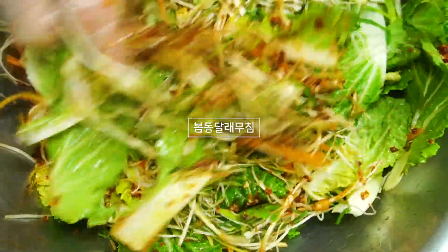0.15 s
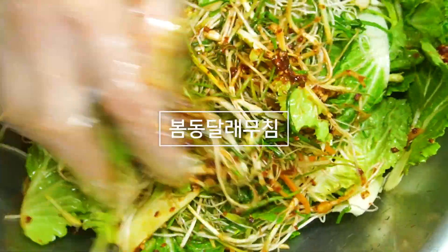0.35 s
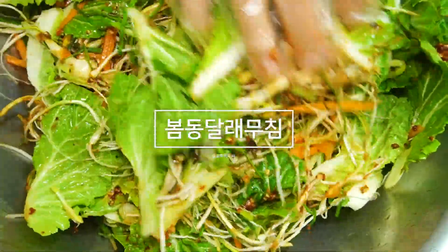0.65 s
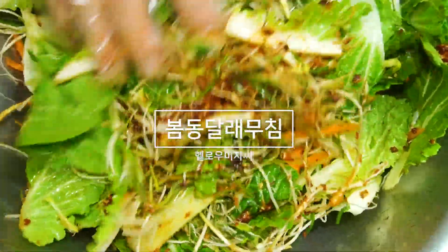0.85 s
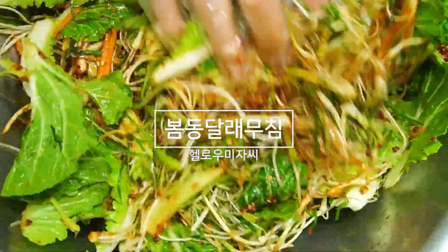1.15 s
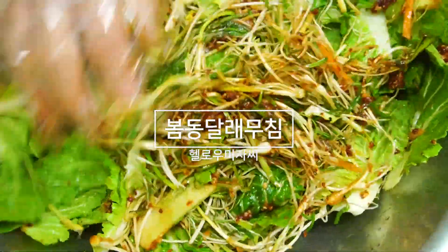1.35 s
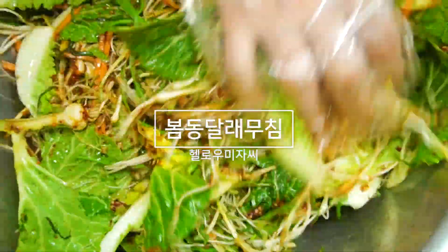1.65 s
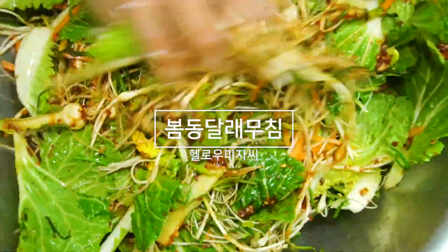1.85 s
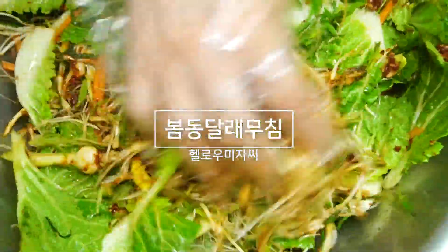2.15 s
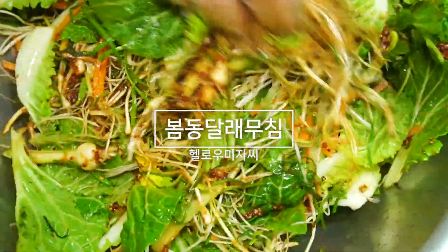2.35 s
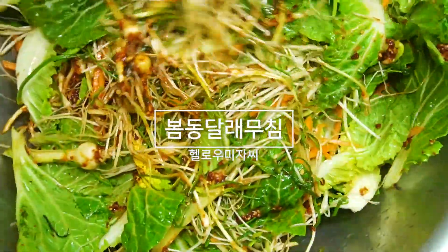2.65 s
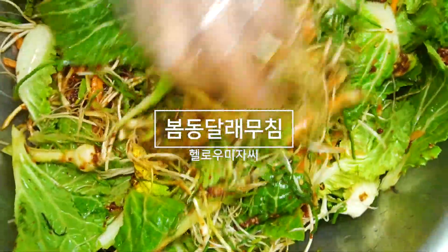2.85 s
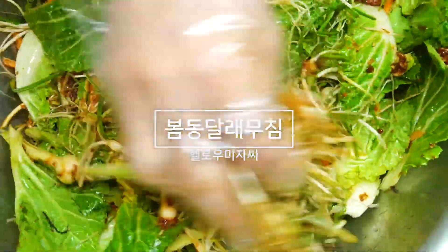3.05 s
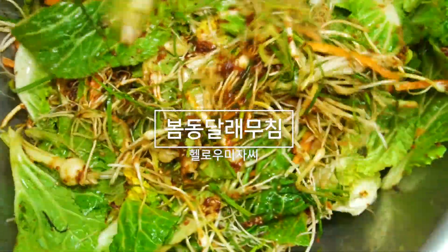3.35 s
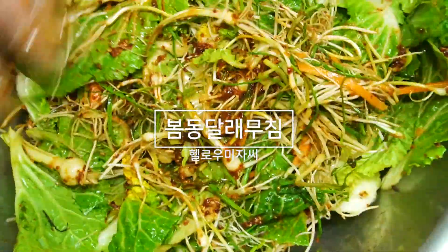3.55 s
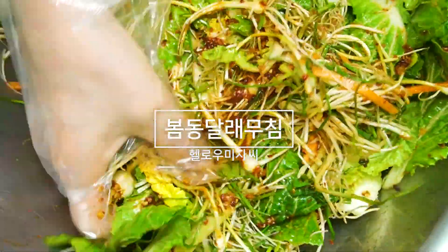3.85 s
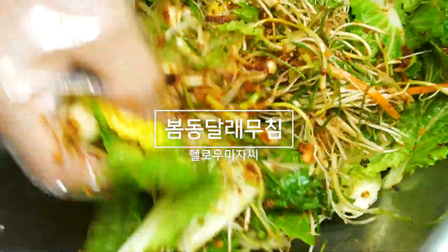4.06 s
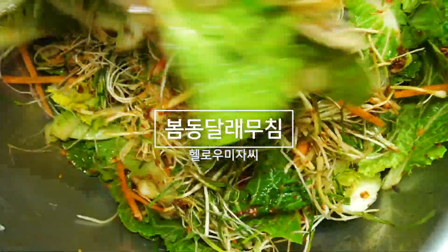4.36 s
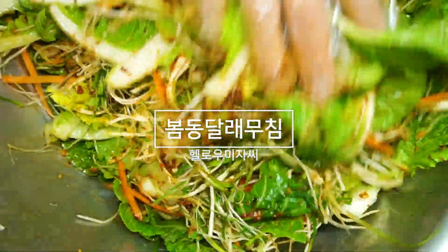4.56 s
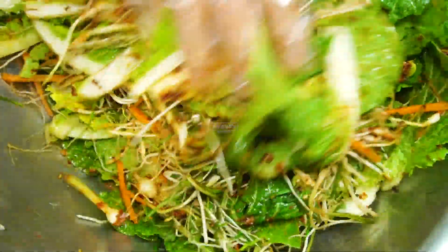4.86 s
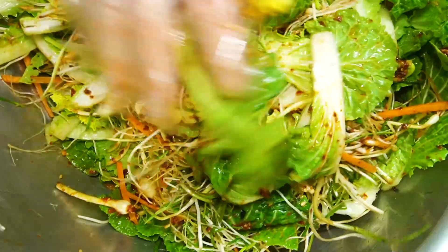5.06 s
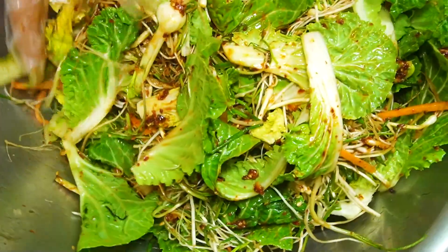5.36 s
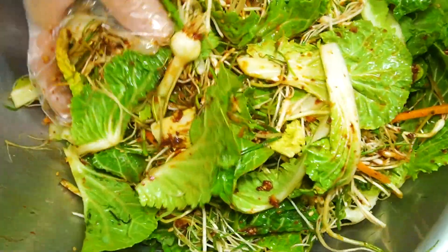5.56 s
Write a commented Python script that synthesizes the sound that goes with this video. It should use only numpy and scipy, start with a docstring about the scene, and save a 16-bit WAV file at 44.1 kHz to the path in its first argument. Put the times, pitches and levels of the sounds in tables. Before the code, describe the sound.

Close up, hands in thin plastic gloves toss dressed leaves and sprouts in a steel bowl. Quick, uneven strokes bring wet rustling, small squelches and tiny pops, topped by bright crinkles and snaps of the plastic. The heap pats dully against the bowl, with a few soft knocks in the middle and near the end. The mixing eases briefly twice, over the faint low hum of a small kitchen.

```python
"""Tossing salad in a steel bowl

Close up, hands in thin plastic gloves toss wet leaves and sprouts. The leaves rustle and squelch
in tiny sticky slips, bubbles of dressing pop, and the glove film crinkles and snaps. The shifting
heap and a few soft knocks sound the damped bowl. Behind it all sits a small kitchen with a low hum."""
import sys
import numpy as np
from scipy import signal
from scipy.fft import rfft, irfft
from scipy.io import wavfile
from scipy.ndimage import uniform_filter1d

SR = 44100
rng = np.random.default_rng(int(sys.argv[2]) if len(sys.argv) > 2 else 0)


def dump_mix(stems):
    """Bounce the given channels to the path in sys.argv[1] as a 16-bit WAV at rate SR."""
    frames = np.atleast_2d(stems).T  # one column per channel
    limited = np.clip(frames, -1, 1)  # hard clip at full scale
    pcm = np.round(limited * 32767).astype(np.int16)
    wavfile.write(sys.argv[1], SR, pcm)


N = 251652
TIME = np.arange(N) / SR

# one row per grab, toss or squeeze: (full grip [s], rise [s], hold [s], fall [s], leaf rustle [dB],
# glove crinkle [dB], push on the bowl [dB], squelch over rustle [dB], glove left over right [dB])
STROKES = [(0.01, 0.017, .01, 0.14, -36.5, -41.5, -45, -6, -5),
           (0.10, 0.018, 0.095, 0.082, -34.5, -37, -46, -5, 3),
           (0.30, 0.091, .01, .2, -37, -37.5, -41.5, -3, 7),
           (0.46, .1, .14, 0.18, -32, -31, -39.5, -3.5, 0),
           (0.76, 0.19, 0.031, 0.24, -30.5, -30, -39.5, -3, -2),
           (0.91, 0.078, 0.054, 0.35, -41.5, -33, -40.5, 2, 1),
           (1.18, 0.13, .03, 0.24, -35, -31, -38.5, -1, -2.5),
           (1.35, 0.13, 0.024, 0.22, -30.5, -30.5, -36.5, -3.5, 3),
           (1.65, 0.24, 0.022, 0.32, -31.5, -32, -38.5, -1, -4.5),
           (1.87, 0.18, 0.11, 0.27, -32.5, -31.5, -40, -3, -0.5),
           (2.16, 0.16, 0.044, 0.23, -34.5, -35, -43, 0, 1.5),
           (2.275, 0.03, 0.0063, 0.061, -34.5, -38, -43, 5, -3),
           (2.35, .04, 0.058, 0.23, -37, -34.5, -43.5, -1, -2),
           (2.55, 0.12, .02, 0.19, -43.5, -43, -51, -3, 2),
           (2.75, 0.14, .03, 0.21, -39.5, -37.5, -43.5, 2.5, 1),
           (2.84, 0.065, 0.014, 0.054, -30, -28.5, -33, -3, 1),
           (2.90, 0.051, 0.017, 0.23, -33, -32.5, -39.5, -3, -1),
           (3.19, 0.11, .02, 0.11, -38, -41.5, -45.5, 1.5, -3),
           (3.27, 0.069, 0.011, 0.15, -33, -32, -39.5, -3, -3),
           (3.37, 0.075, 0.048, 0.22, -33.5, -30, -40, 2, 0),
           (3.55, 0.089, 0.22, 0.19, -32.5, -34, -37, -4.5, 9),
           (3.78, 0.076, 0.033, .025, -25.5, -39, -38, 5, 7),
           (3.87, 0.055, 0.078, 0.2, -32.5, -33, -40, 4, 1),
           (4.11, 0.054, 0.017, 0.31, -48, -56, -56, 3, -4),
           (4.375, 0.056, 0.056, 0.29, -37, -31.5, -46, -0.5, 1),
           (4.53, 0.097, .03, 0.12, -29, -30.5, -36.5, -11, -1),
           (4.63, .07, .08, 0.18, -30.5, -29.5, -37, -1, -4),
           (4.85, 0.089, 0.094, 0.05, -37, -33, -43.5, 3, 0),
           (5.08, 0.17, .02, 0.36, -37, -36.5, -45.5, 0.5, -0.5),
           (5.27, 0.025, 0.068, 0.24, -30, -35.5, -37.5, -11.5, 9),
           (5.40, 0.1, 0.11, 0.15, -28, -30.5, -35.5, 6, 1),
           (5.58, 0.15, .14, .3, -27.5, -32, -38.5, 3, 11)]
RUSTLE, CRINKLE, PUSH, WETNESS, SIDE = 4, 5, 6, 7, 8  # its columns
# room tone of the kitchen: (frequency [Hz], level [dB])
AIR_EQ = [(20, -18), (46, -11), (70, -10.5), (105, 1), (140, -2), (175, -7.5), (220, 0.5), (280, -10),
          (750, -7), (1100, -33), (2500, -57), (16000, -39.5)]
# tone of the leaf slips: (frequency [Hz], level [dB])
LEAF_EQ = [(200, -23), (700, -6), (1100, -7.5), (1900, -1), (2500, -4), (3500, -1), (5000, -4.5),
           (7500, -10), (16000, -9.5)]
# tone of the heap's pats: (frequency [Hz], level [dB])
HEAP_EQ = [(40, -3.5), (150, -3), (400, 4), (900, 2), (1600, -11), (3500, -31)]
# resonances of the loaded bowl and its hollow: (pitch [Hz], width [Hz], level [dB])
BOWL_MODES = [(130, 50, -3), (213, 22, -5.5), (364, 116, -8.5), (543, 90, -3.5), (749, 81, 3.5),
              (830, 52, -3.5), (890, 45, -4.5), (1260, 77, 7.5), (1400, 54, 4.5)]
# tone of the glove film: (frequency [Hz], level [dB])
FILM_EQ = [(500, -35), (2500, 11), (5000, 0.5), (8000, 0), (12500, 2.5), (16000, -2.5)]
# featured snaps of film and stalks: (time [s], relative energy [dB], band centre [Hz])
LOUD_SNAPS = [(0.0888, 3.5, 9100), (0.0985, 1, 7000), (0.2022, -1, 4100), (0.2785, -6.5, 5860),
              (0.4037, -6, 3580), (0.4618, 0.5, 7400), (0.4728, 3.5, 8900), (0.581, 2.5, 7050),
              (0.6722, -7, 10500), (0.6798, -2, 4700), (0.7115, -1, 6500), (0.7375, -8, 7700),
              (0.9406, -3, 6500), (0.9758, -4, 4400), (1.0085, -3, 8700), (1.1418, -2, 8810),
              (1.1608, 2, 11500), (1.3216, 0.5, 7300), (1.4922, -1, 10400), (1.6051, 2.5, 8800),
              (1.6589, 1, 8060), (1.6668, 0, 3900), (1.9538, 1, 6040), (2.0025, -1, 6600),
              (2.0244, -2, 9400), (2.0846, -1.5, 7700), (2.1593, -1, 6960), (2.2691, -2, 4800),
              (2.3244, -5.5, 8500), (2.3711, -3.5, 4200), (2.4499, -3, 7850), (2.4606, -3, 6350),
              (2.5036, 0, 7700), (2.5318, 2.5, 8300), (2.7215, -3.5, 8470), (2.8558, 2.5, 3380),
              (2.893, 1, 5030), (3.0593, -1, 6500), (3.2758, 0.5, 9000), (3.4064, -4, 9700),
              (3.4195, 0, 6000), (3.5305, 0.5, 7800), (3.6038, -4, 6300), (3.7331, -6, 9700),
              (3.7524, -2, 3600), (3.8272, 4.5, 2560), (4.0208, -9, 7000), (4.3991, 1, 8700),
              (4.4363, 0, 9300), (4.4876, -2.5, 2400), (4.5513, 2.5, 6500), (4.6205, 1, 8500),
              (4.6956, -1, 2960), (4.8502, -2, 6900), (5.0294, -8.5, 6600), (5.078, 0, 7360),
              (5.1184, -2.5, 5700), (5.1481, -3, 7100), (5.2245, -8, 5470), (5.2564, 0, 5470),
              (5.3822, -1, 3900), (5.5871, -2, 2390), (5.6178, -9, 2980)]
# clumps and knuckles land on the bowl: (time [s], relative level [dB], pitch [Hz], t60 [s])
BOWL_KNOCKS = [(1.209, -28, 884, 0.055), (2.825, -45, 94.5, 0.14), (2.852, -23, 775, 0.065),
               (2.914, -19.5, 790, 0.031), (3.752, -38, 122, .13), (4.345, -30.5, 694, 0.06),
               (5.266, -26.5, 371, 0.085), (5.378, -25, 474, .04), (5.436, -29, 352, 0.15),
               (5.492, -33, 218, 0.16), (5.512, -36, 110, 0.065), (5.552, -39, 56.4, .15)]
# how alike diffuse sound is left and right: (frequency [Hz], likeness [0-1])
STEREO_LIKENESS = [(50, 1), (1000, 0.84), (2200, 1), (4000, 0.68), (6500, 0.05), (16000, 0.76)]
# reverb time of the kitchen: (frequency [Hz], t60 [s])
KITCHEN_DECAY = [(150, 0.83), (1000, 0.21), (4000, 0.097), (9000, 0.17), (16000, 0.41)]


def amp(db):
    """Decibels to gain."""
    return 10 ** (np.asarray(db) / 20)


def pan(db):
    """Stereo gains that put left db above right."""
    return amp([[db / 2], [-db / 2]])


def unit_rms(x):
    """Scales to rms 1."""
    return x / np.sqrt(np.mean(x ** 2) + 1e-20)


def curve_at(points, hz):
    """Reads a table on a log-frequency axis."""
    f, value = np.transpose(points)
    return np.interp(np.log(hz + 1), np.log(f), value)


def add(mix, s, sound):
    """Mixes a sound in at time s."""
    part = mix[:, max(round(s * SR), 0):][:, :sound.shape[1]]
    part += sound[:, :part.shape[1]]


def eq(x, spectrum, size=4096):
    """Minimum-phase EQ, so clicks keep their sharp attack."""
    log_gain = np.log(amp(curve_at(spectrum, abs(np.fft.fftfreq(size, 1 / SR)))))
    response = np.exp(np.conj(signal.hilbert(log_gain)))
    taps = np.fft.ifft(response).real[:size // 2]
    return signal.oaconvolve(x, taps[None], axes=1)[:, :N]


def diffuse_noise(size):
    """White noise from all sides: centred in the bass, wider in the treble."""
    common, apart = rfft(rng.standard_normal((2, size)))
    same = np.clip(curve_at(STEREO_LIKENESS, np.fft.rfftfreq(size, 1 / SR)), 0, 1)
    mid, side = common * np.sqrt((1 + same) / 2), apart * np.sqrt((1 - same) / 2)
    return irfft(np.array([mid + side, mid - side]), size)


def wander(hz):
    """Random modulator of rms 1, rolled off above hz."""
    rolloff = 1 + (np.fft.rfftfreq(N, 1 / SR) / hz) ** 4
    return unit_rms(irfft(rfft(rng.standard_normal(N)) / rolloff, N))


def stroke_envelopes():
    """Times and each stroke's power: up 20 dB over its rise, a hold, then an ever faster fade."""
    t = np.linspace(0, N / SR, 1200)
    grip, rise, hold, fall = np.array(STROKES).T[:4, :, None]
    away = np.maximum(grip - t, 0) / rise + np.maximum(t - grip - hold, 0) / fall
    return t, amp(-20 * away ** 1.5) ** 2


def stroke_gain(column):
    """Fader ride for one layer: overlapping strokes add in power."""
    t, power = stroke_envelopes()
    gains = amp(np.array(STROKES)[:, column])
    return np.interp(TIME, t, np.sqrt(gains ** 2 @ power))


def stroke_blend(column):
    """Wetness or side in dB, crossfaded between strokes by their envelopes."""
    t, power = stroke_envelopes()
    return np.interp(TIME, t, np.array(STROKES)[:, column] @ power / (power.sum(0) + 1e-20))


def buckle(kicks, noise, hz, octaves, ring_s, flutter):
    """Each kick is a sharp impulse plus a noisy flutter of the surface, in a band of hz +/- octaves."""
    keep = np.exp(-1 / (SR * ring_s))
    shaking = np.sqrt(signal.lfilter([1 - keep], [1, -keep], kicks ** 2 + 1e-18))
    edges = np.clip([hz / 2 ** octaves, hz * 2 ** octaves], [20, 40], [15000, 19000])
    band = signal.butter(2, edges, "bandpass", fs=SR)
    return signal.lfilter(*band, kicks + flutter * shaking * noise)


def grains(per_s, spread_db, clump_db, clump_hz, low_hz, high_hz,
           octaves, ring_s, flutter, pan_db, lag_samples, bands=10):
    """A steady crackle of buckles, mostly small, bunching as things catch and let go."""
    bunch, noise, out = amp(clump_db * wander(clump_hz)), diffuse_noise(N), np.zeros((2, N))
    for hz in np.geomspace(low_hz, high_hz, bands):
        chance, strength, place = rng.random(N), rng.exponential(1, N), rng.standard_normal(N)
        at = np.flatnonzero(chance < per_s / bands / SR)
        force = amp(spread_db * np.minimum(strength[at], 4)) * bunch[at] * (-1) ** at
        # an off-centre grain is louder and earlier on its own side
        lag = np.round(lag_samples * place[at]).astype(int)
        kicks = np.zeros((2, N))
        kicks[0, at] = force * amp(pan_db * place[at] / 2)
        kicks[1, (at + lag) % N] = force * amp(-pan_db * place[at] / 2)
        out += buckle(kicks, noise, hz, octaves, ring_s, flutter)
    # even out the crackle's loudness, so the strokes shape its swells
    power = uniform_filter1d(uniform_filter1d((out ** 2).mean(0), size=2400), size=1600)
    return out / np.sqrt(power + 1e-12)


def room_tone(air_db=-51, hum_hz=46.7, hum_db=-58):
    """A bed of low air noise and the slightly wavering hum of an appliance."""
    hum = np.sin(2 * np.pi * hum_hz * TIME + .4 * wander(3)) * amp(1.5 * wander(7))
    air = eq(diffuse_noise(N), AIR_EQ)
    return amp(air_db) * unit_rms(air) + amp(hum_db) * unit_rms(hum)


def leaves():
    """Leaves and sprouts slide in tiny sticky slips; pressed wet, the slips turn lower and squelch."""
    squelch = grains(per_s=1200, spread_db=3, clump_db=-0.6, clump_hz=71, low_hz=768, high_hz=2560,
                     octaves=0.41, ring_s=0.0016, flutter=1, pan_db=2.5, lag_samples=1)
    rustle = grains(per_s=1400, spread_db=3, clump_db=1.9, clump_hz=71.6, low_hz=3110, high_hz=8900,
                    octaves=0.57, ring_s=0.0014, flutter=1, pan_db=1, lag_samples=0.45)
    wet = amp(stroke_blend(WETNESS))
    slips = (wet * unit_rms(eq(squelch, LEAF_EQ)) + unit_rms(eq(rustle, LEAF_EQ))) / np.hypot(1, wet)
    # crisp sprouts flick free: sparser, broadband ticks
    flicks = grains(per_s=130, spread_db=2.5, clump_db=2, clump_hz=30, low_hz=1770, high_hz=4200,
                    octaves=1.33, ring_s=0.0025, flutter=1, pan_db=1, lag_samples=0.82, bands=4)
    return stroke_gain(RUSTLE) * (slips + amp(-5.5) * unit_rms(flicks))


def bubbles(per_s=70, spread_db=2.2, low_hz=2000, high_hz=4800, ring_cycles=3):
    """Wet leaves part and tiny bubbles of dressing burst, each ringing briefly at its own pitch."""
    out, t = np.zeros((2, N)), np.arange(700) / SR
    wait, pitch, strength, side = rng.random((700, 4)).T
    times = np.cumsum(-np.log(1 - wait)) / per_s
    pitches = low_hz * (high_hz / low_hz) ** pitch
    levels = 4 + spread_db * np.minimum(-np.log(1 - strength), 4)
    for s, hz, db, pan_db in zip(times, pitches, levels, 3 * (2 * side - 1)):
        envelope = (1 - np.exp(-2 * hz * t)) * np.exp(-hz * t / ring_cycles)
        add(out, s, amp(db) * pan(pan_db) * envelope * np.sin(2 * np.pi * hz * t))
    return stroke_gain(RUSTLE) * out


def heap_on_bowl():
    """Soft pats of the heap sound the bowl, which its load damps heavily."""
    pats = grains(per_s=1700, spread_db=2, clump_db=2.5, clump_hz=41, low_hz=57.3, high_hz=2150,
                  octaves=0.78, ring_s=0.0031, flutter=0.65, pan_db=0.6, lag_samples=0.49)
    pats = eq(pats, HEAP_EQ)
    ring = sum(amp(db) * signal.lfilter(*signal.iirpeak(hz, hz / width, fs=SR), pats)
               for hz, width, db in BOWL_MODES)
    return amp(-1.5) * stroke_gain(PUSH) * unit_rms(ring + amp(-15) * pats)


def gloves():
    """Creases of thin film flip with very short, bright ticks, panned with the working hand."""
    ticks = grains(per_s=1200, spread_db=5, clump_db=2, clump_hz=60.5, low_hz=3670, high_hz=13400,
                   octaves=0.73, ring_s=0.00097, flutter=0.97, pan_db=6, lag_samples=0.56)
    side_db = stroke_blend(SIDE)
    return stroke_gain(CRINKLE) * amp([side_db / 2, -side_db / 2]) * unit_rms(eq(ticks, FILM_EQ))


def click(hz, octaves, pan_db, ring_s, flutter, size=1024):
    """A one-shot buckle, set to energy 1 a side and then panned."""
    kick = np.zeros((2, size))
    kick[:, 4] = 1
    sound = buckle(kick, diffuse_noise(size), hz, octaves, ring_s, flutter)
    return pan(pan_db) * sound / np.linalg.norm(sound, axis=1, keepdims=True)


def lesser_snaps(per_s=12, over_crinkle_db=25.5, spread_db=2.5, low_hz=4200, high_hz=11500):
    """Random cues for filler snaps, as strong as the glove is being worked."""
    wait, pitch, strength = rng.random((400, 3)).T
    times = np.cumsum(-np.log(1 - wait)) / per_s
    crinkle_db = 20 * np.log10(np.interp(times, TIME, stroke_gain(CRINKLE)))
    levels = crinkle_db + over_crinkle_db + spread_db * (2 * strength - 1)
    pitches = low_hz * (high_hz / low_hz) ** pitch
    return [cue for cue in zip(times, levels, pitches) if cue[0] < N / SR]


def snaps(ring_cycles=3.1, stalk_hz=4270, crumble_db=-10):
    """Creases snap and stalks break at the hand: a crack, longer when low, over a duller crumble."""
    out, side_db = np.zeros((2, N)), stroke_blend(SIDE)
    for s, db, hz in list(LOUD_SNAPS) + lesser_snaps():
        octaves = 0.85 * min(hz / stalk_hz, 1)  # low snaps narrow to the pop of a stalk
        pan_db = 0.32 * np.interp(s, TIME, side_db)
        crack = click(hz, octaves, pan_db, ring_s=ring_cycles / hz, flutter=2.8)
        crumble = click(hz * 0.51, octaves, pan_db / 2, ring_s=0.0026, flutter=0.43)
        add(out, s, amp(db) * (crack + amp(crumble_db) * crumble))
    return out


def knocks(attack_s=0.0011):
    """Clumps and knuckles bump the bowl: a rounded attack and a short ring."""
    out, t = np.zeros((2, N)), np.arange(SR // 4) / SR
    for s, db, hz, t60 in BOWL_KNOCKS:
        envelope = amp(db - 60 * t / t60) * (1 - np.exp(-t / attack_s))
        add(out, s, (envelope * np.sin(2 * np.pi * hz * t))[None])
    return out


def kitchen_reverb(x, wet_db=-9, rise_s=0.0048):
    """Adds the short, diffuse tail of a small room."""
    hz, t, spectrum = signal.stft(diffuse_noise(SR // 2), SR, nperseg=256)
    decay = amp(-60 * t / curve_at(KITCHEN_DECAY, hz)[:, None])
    tail = signal.istft(spectrum * decay, SR, nperseg=256)[1]
    tail *= np.clip(np.arange(tail.shape[1]) / SR / rise_s, 0, 1)
    return x + amp(wet_db) * signal.fftconvolve(x, tail / np.linalg.norm(tail[0]), axes=1)[:, :N]


def scene():
    """The mix: bowl just right of centre, gloves and snaps on top, room tone underneath."""
    catch = amp(0.98 * wander(hz=29))  # leaves, heap and gloves catch and give together
    tossing = catch * (amp(0.06) * leaves() + bubbles() + heap_on_bowl())
    bowl = pan(-0.5) * (tossing + knocks())
    foreground = bowl + amp(-0.3) * catch * gloves() + amp(-0.4) * snaps()
    return amp(-0.69) * kitchen_reverb(foreground) + room_tone()


def record(dry, cutoff_hz=16050):
    """A steep high cut on the master."""
    taps = signal.firwin(401, cutoff_hz, window=("kaiser", 8), fs=SR)
    return signal.oaconvolve(dry, taps[None], "same")


dry = scene()
out = record(dry)
dump_mix(out)
```